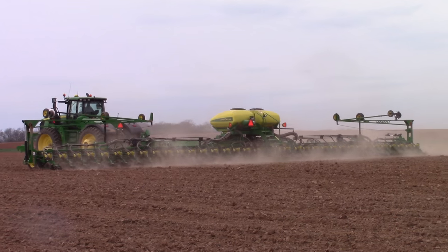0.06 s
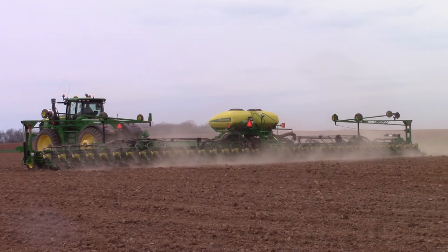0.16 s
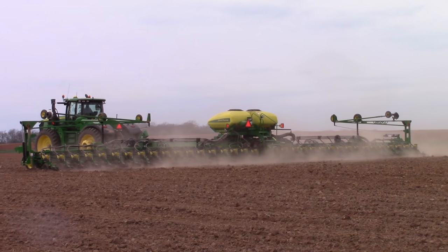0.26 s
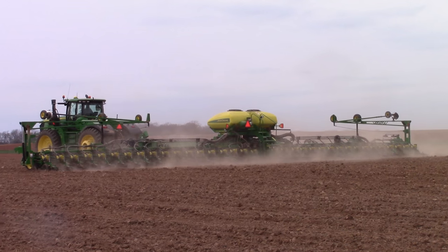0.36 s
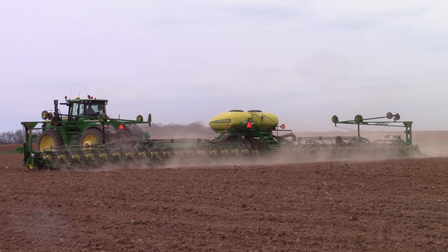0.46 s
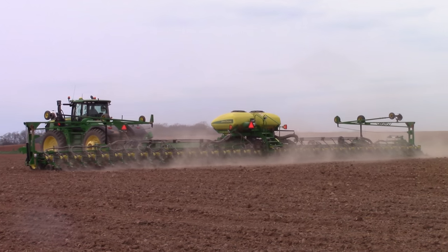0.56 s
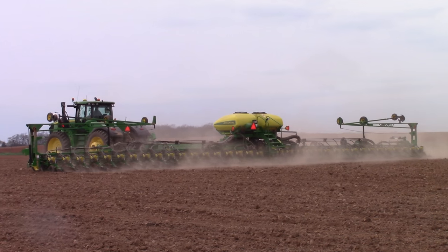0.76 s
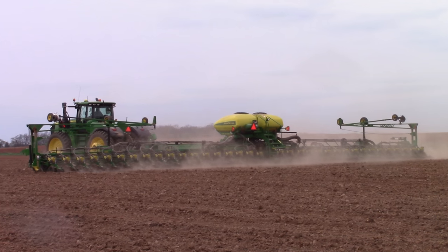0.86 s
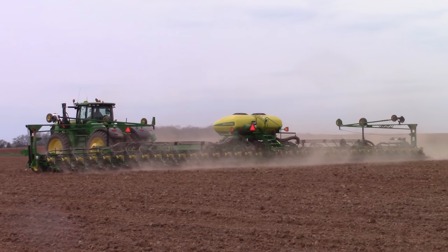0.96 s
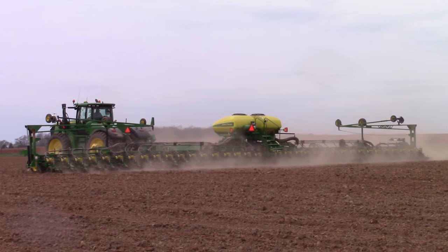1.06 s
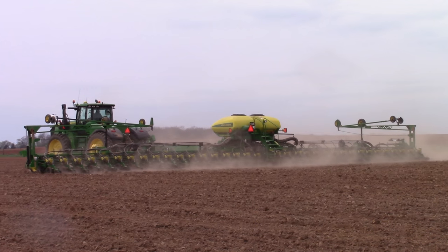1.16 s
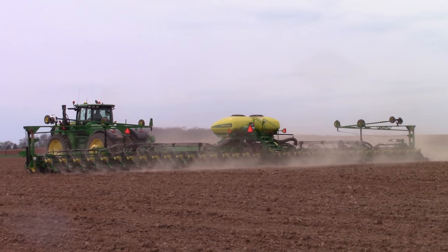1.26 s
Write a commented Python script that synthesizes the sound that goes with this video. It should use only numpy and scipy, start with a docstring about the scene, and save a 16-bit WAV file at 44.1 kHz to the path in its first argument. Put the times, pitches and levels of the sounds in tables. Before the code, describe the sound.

Distant tractor running with a steady whine, thin metal squeaks and a brief thudding wind gust.

```python
"""A distant tractor pulls a wide planter over a dry field at a steady speed.
Engine orders and fans whine on one shaft over a rush of air, combustion noise and hissing soil.
The steel row units squeak thinly as they rub, and a faint sizzle sits on top.
Close up, a gust buffets the microphone three times with turbulent thuds, and weaker puffs follow."""
import sys
import numpy as np
from scipy import signal
from scipy.fft import rfft, irfft, next_fast_len
from scipy.io import wavfile
from scipy.ndimage import uniform_filter1d

SR = 44100
rng = np.random.default_rng(int(sys.argv[2]) if len(sys.argv) > 2 else 0)


def dump(signal):
    """Clip the signal to [-1, 1] and save it as 16-bit WAV at the path in sys.argv[1]."""
    limited = np.clip(np.atleast_2d(signal).T, -1, 1)
    pcm = np.round(limited * 32767).astype(np.int16)
    wavfile.write(sys.argv[1], SR, pcm)


N = 57330

CRANK_HZ = 36.54
# Level ride on the midrange of the rush; the high whine follows it: time_s, gain_db
MID_RIDE = [(0, -1), (.25, -1), (.45, 0.5), (.74, 2.5), (.9, -1), (1.05, -0.5), (1.3, -0.5)]


def undb(db):
    """Decibels to gain."""
    return 10 ** (np.asarray(db) / 20)


def unit(x):
    """Scale to rms 1."""
    return x / np.sqrt(np.mean(x ** 2))


def curve(rows):
    """Join (time_s, value) points by straight lines."""
    return np.interp(np.arange(N) / SR, *np.array(rows).T)


def walk(rate_hz):
    """Smooth random modulation of rms about 1, rolling off above rate_hz."""
    size = next_fast_len(2 * N)
    f = np.fft.rfftfreq(size, 1 / SR)
    spectrum = rfft(rng.standard_normal(size)) * np.exp(-(f / rate_hz) ** 2)
    return unit(irfft(spectrum, size))[:N]


def noise(colour):
    """Noise of rms 1, shaped by (freq_hz, gain_db) points."""
    hz, db = np.array(colour).T
    f = np.fft.rfftfreq(N, 1 / SR) + 1
    gain = undb(np.interp(np.log(f), np.log(hz), db)) * np.minimum(f / hz[0], 1) ** 2
    return unit(irfft(gain * np.exp(2j * np.pi * rng.random(len(f))), N))


def band(x, hz, width_hz):
    """A resonance with gain 1 at its centre."""
    f = np.fft.rfftfreq(N, 1 / SR) + 1
    return irfft(rfft(x) / (1 + ((f - hz * hz / f) / width_hz) ** 2), N)


def high_pass(x, hz):
    """Two-pole low cut."""
    return signal.sosfilt(signal.butter(2, hz, "high", fs=SR, output="sos"), x)


def swell(centre_s, length_s, steepness):
    """A rounded rise and fall around a moment."""
    return np.exp(-np.abs(2 * (np.arange(N) / SR - centre_s) / length_s) ** steepness / 2)


def stereo(mid, side):
    """Left and right from mid and side."""
    return np.array([mid + side, mid - side])


def whine(shaft_time):
    """Engine, gears, fan and blower sing shimmering tones, all turning with the same shaft."""
    # Engine and gear tones: multiple_of_crank_speed
    engine_orders = [15, 18, 19, 20, 30.4, 32.9, 38, 40.1, 47.45, 57, 66.5, 76]
    # Base level of each of those tones: level_db
    engine_db = [-57, -53, -48.5, -49, -57, -57, -53.5, -59.5, -66, -54, -57.5, -60]
    # Fan harmonics, fundamental first: level_db
    fan_db = [-38, -64, -61, -68]
    # Blower harmonics, fundamental first: level_db
    blower_db = [-54, -54]
    fan_hz, blower_hz = 620, 834.7
    tones = [(order * CRANK_HZ, db) for order, db in zip(engine_orders, engine_db)]
    for hz, levels in ((fan_hz, fan_db), (blower_hz, blower_db)):
        tones += [((k + 1) * hz, db) for k, db in enumerate(levels)]
    out = 0
    for hz, db in tones:
        shimmer_db = 2.1 * np.sqrt(hz / 2000) * walk(rate_hz=14)
        ride_db = 2.56 * curve(MID_RIDE) * (hz > 1800)  # high tones swell with the rush
        tone = np.sqrt(2) * np.sin(2 * np.pi * (hz * shaft_time + rng.random()))
        out = out + undb(db + shimmer_db + ride_db) * tone
    return out


def rush(shaft_time):
    """Fan air, combustion noise that throbs with the firings, and soil hissing past the discs."""
    # Colour of the machine's rush: freq_hz, gain_db
    air_colour = [(45, -31), (70, -10), (130, -13.5), (200, -14), (300, -14.5), (480, -17.5), (640, -15.5),
                  (780, -14.5), (930, -18.5), (1300, -15.5), (2050, -17), (2600, -23), (3300, -22.5),
                  (4500, -29.5), (5300, -34.5), (7500, -33.5), (9400, -34), (11000, -41.5), (13500, -53)]
    # Colour of its stereo width: freq_hz, gain_db
    side_colour = [(100, -18), (400, 1), (620, -12), (800, -1), (1000, 3.5), (2700, 2), (3600, -19),
                   (5000, -6), (8000, -28), (11500, -6.5), (14000, -22)]
    # Level ride on the soil hiss: time_s, gain_db
    hiss_ride = [(0, -2.2), (.4, 1.7), (.9, -0.72), (1.18, 3), (1.3, 3)]
    air = noise(air_colour)
    mids, hiss = band(air, 1700, width_hz=1400), band(air, 5500, width_hz=7500)
    throb = 1 + 0.14 * np.cos(2 * np.pi * 3 * CRANK_HZ * shaft_time)  # three firings a turn
    air = air + mids * (undb(curve(MID_RIDE)) * throb - 1)
    air = air + hiss * (undb(curve(hiss_ride) + 1.28 * walk(rate_hz=31)) - 1)
    roar = unit(band(rng.standard_normal(N), 628, width_hz=190))  # resonance around the fan tone
    side = undb(-28.5) * noise(side_colour)
    return undb(-40) * stereo(air, side) + undb(-45.5) * roar


def squeaks():
    """Dry steel rubs and sings briefly; uneven slipping scatters the pitch, stutters and scrapes."""
    # Rubs in the row units: centre_s, length_s, pitch_hz, level_db, roughness (0 is smoothest)
    rubs = [(0, 0.11, 10270, -57.5, 0.26), (.112, 0.056, 9505, -49.5, 0.13), (.113, 0.053, 10880, -54, 0.8),
            (0.153, 0.053, 11970, -54.5, .1), (0.198, 0.024, 11100, -52, 0.7),
            (.25, 0.028, 12060, -57, .15), (.253, .04, 8280, -58, 0.4), (0.266, 0.024, 11100, -51.5, 0.97),
            (0.313, 0.026, 12700, -48, 0.44), (.375, 0.051, 12830, -60, .15), (0.49, 0.015, 12450, -54, .6),
            (0.65, 0.038, 12300, -59, 0.22), (0.754, 0.089, 9540, -51, .1), (0.83, 0.087, 12000, -56, 0.25),
            (0.903, 0.061, 11050, -50.5, .7), (0.984, 0.058, 11370, -54, 0.54),
            (0.988, .11, 12400, -58, 1.1), (1.06, 0.045, 1950, -44, 0.18), (1.135, .03, 11300, -57, .6),
            (1.19, 0.023, 9200, -53.5, 0.33), (1.28, 0.017, 9130, -47, 0.2),
            (1.285, 0.038, 12200, -60, .25)]
    out = 0
    for centre_s, length_s, hz, db, roughness in rubs:
        pitch_hz = hz + roughness * 140 * walk(rate_hz=276)
        chatter = 1 + roughness * 0.74 * walk(rate_hz=420)
        stutter = undb(3.5 * walk(rate_hz=59))
        grip = unit(stutter * chatter) * swell(centre_s, length_s, steepness=1.23)
        tone = np.sqrt(2) * np.sin(2 * np.pi * np.cumsum(pitch_hz) / SR)
        out = out + undb(db) * grip * tone
    return out


def sizzle():
    """A faint, flickering band of very high hiss."""
    level_db = -69.5 + 5.1 * walk(rate_hz=25)
    return undb(level_db) * unit(band(rng.standard_normal(N), 14300, width_hz=570))


def eddies(colour, evenness):
    """Turbulent pressure: swings of irregular length, their size levelled by evenness (0 to 1)."""
    pressure = signal.hilbert(noise(colour))
    power = uniform_filter1d(np.abs(pressure) ** 2, int(SR * 0.0043))
    return unit(pressure.real / power ** (evenness / 2))


def wind():
    """Each puff thuds on the microphone; hard ones add a harsh edge, soft ones a deep thump."""
    # Puffs of wind: centre_s, length_s, level_db, edge_relative_db, thump_relative_db
    puffs = [(0.208, 0.057, -43, -18, 4), (0.256, 0.036, -20, -16.5, -8), (0.282, 0.015, -9.5, -4.5, -12),
             (0.297, .014, -15, -4, -17), (0.328, 0.069, -24, -12.5, -16), (0.373, 0.024, -12, -8.5, -27),
             (0.402, 0.08, -23.5, -19, -5.5), (0.445, 0.047, -22.5, -12.5, -1.5),
             (0.467, 0.016, -10, -17, -11.5), (0.482, 0.0048, -11, -16, -3), (.497, 0.015, -27, -27, -3),
             (.698, 0.011, -31, -21, -6), (.724, 0.023, -34.5, -15, -0.5), (0.772, 0.01, -33, -12, 2.5),
             (0.81, 0.11, -38, -25, 2), (0.84, 0.0036, -34.5, -27, 6), (0.88, 0.015, -26.5, -33, 1.5),
             (0.907, 0.026, -35, -34, 3.5), (1.249, 0.02, -41.5, -33, 2), (0.565, 0.053, -55, -31, 12.5),
             (0.663, 0.034, -52.5, -29, 12.5), (1, 0.15, -54.5, -33, 7)]
    # Colour of the buffeting's body: freq_hz, gain_db
    thud_colour = [(30, -56), (60, -51), (90, -28), (130, -15), (200, -4.5), (290, 1.5), (400, -7),
                   (600, -17), (1000, -49), (2000, -73), (6000, -100)]
    # Colour of its harsh edge: freq_hz, gain_db
    edge_colour = [(100, -61), (250, 4), (400, 3.5), (600, 2), (850, -2), (1200, -12.5), (1700, -23),
                   (3000, -48), (8000, -87)]
    # Colour of its deep thump: freq_hz, gain_db
    thump_colour = [(25, -41), (50, -15), (80, -10.5), (120, -3), (170, 1.5), (260, -16), (500, -56),
                    (2000, -83)]
    thud_power, edge_power, thump_power = undb(-70) ** 2, 0, 0  # the air never quite rests
    for centre_s, length_s, db, edge_db, thump_db in puffs:
        power = (undb(db) * swell(centre_s, length_s, steepness=3.2)) ** 2
        thud_power += power
        edge_power += power * undb(edge_db) ** 2
        thump_power += power * undb(thump_db) ** 2
    thud_gain, edge_gain, thump_gain = np.sqrt([thud_power, edge_power, thump_power])
    mid = thud_gain * eddies(thud_colour, evenness=0.72) + edge_gain * eddies(edge_colour, evenness=0.5)
    # Small eddies hit the two microphone ports differently; the thump is nearly mono.
    stray = thud_gain * noise(thud_colour) + edge_gain * noise(edge_colour)
    side = high_pass(undb(-2) * mid + undb(-11.5) * stray, hz=575)
    thump = stereo(eddies(thump_colour, evenness=1.0), undb(-28.5) * noise(thump_colour))
    return stereo(mid, side) + thump_gain * thump


def scene():
    """The machine straight ahead, its shaft speed drifting slightly, and wind at the microphone."""
    shaft_speed = 1 + 0.0011 * walk(rate_hz=2.66)
    shaft_time = np.cumsum(shaft_speed) / SR
    return whine(shaft_time) + rush(shaft_time) + squeaks() + sizzle() + wind()


def record(dry):
    """A gentle low cut thins the deep bass, and a steep high cut takes off the top."""
    low_cut_hz, high_cut_hz = 100, 15100
    high_cut = signal.ellip(10, .2, 80, high_cut_hz, fs=SR, output="sos")
    return signal.sosfilt(high_cut, high_pass(dry, low_cut_hz))


dry = scene()
out = record(dry)
dump(out)
```